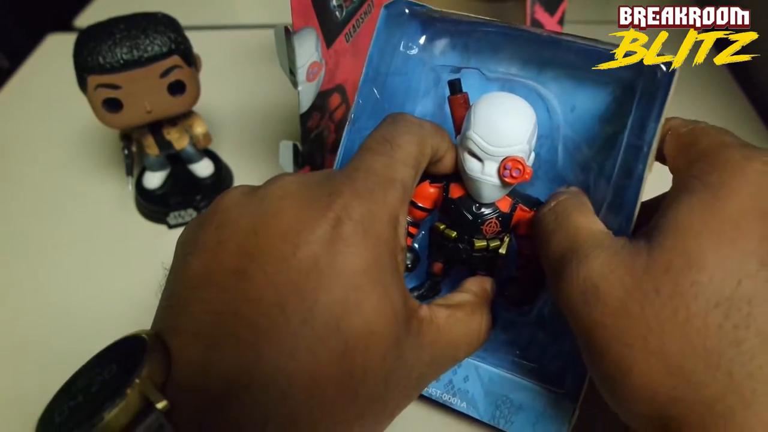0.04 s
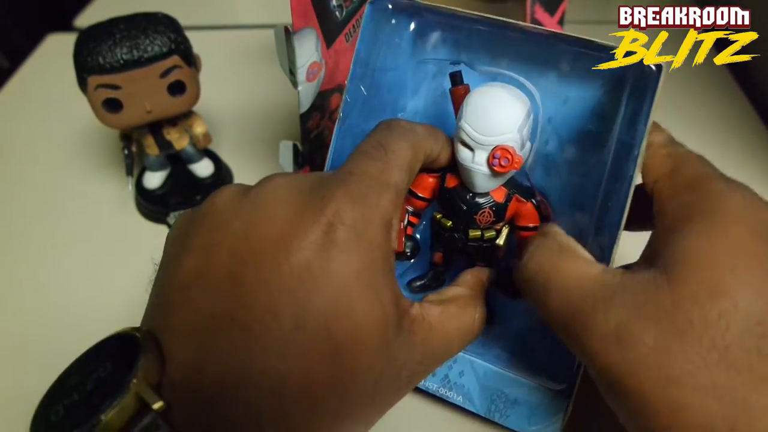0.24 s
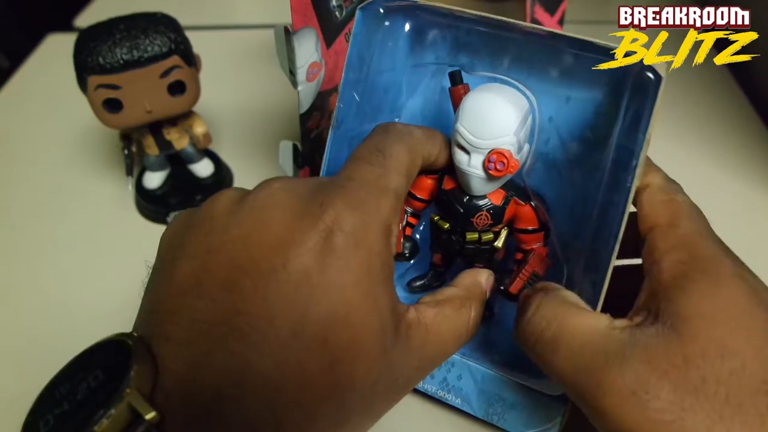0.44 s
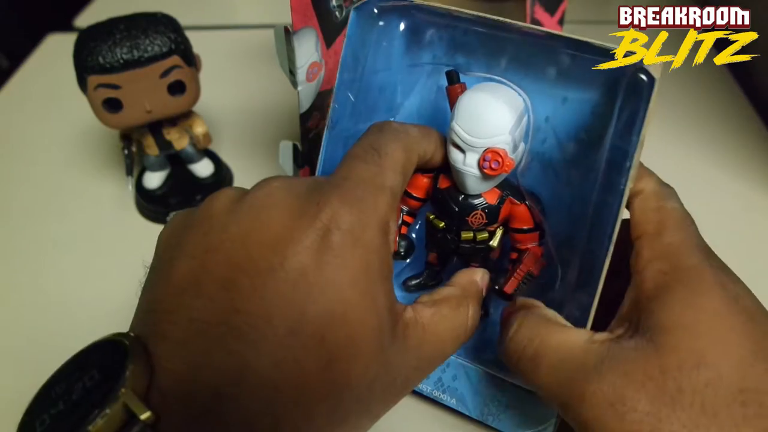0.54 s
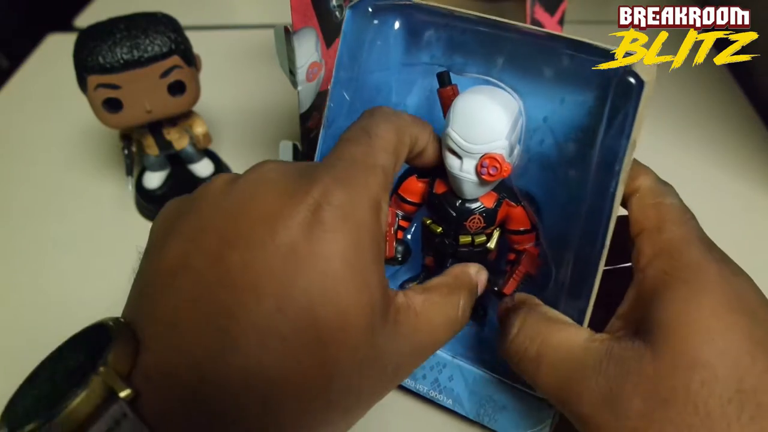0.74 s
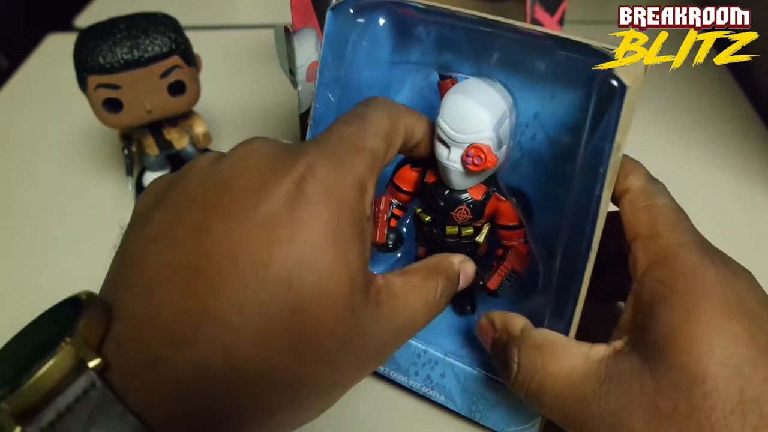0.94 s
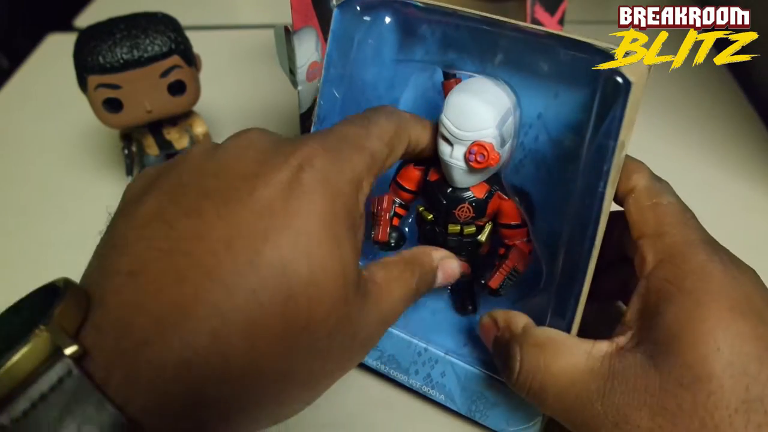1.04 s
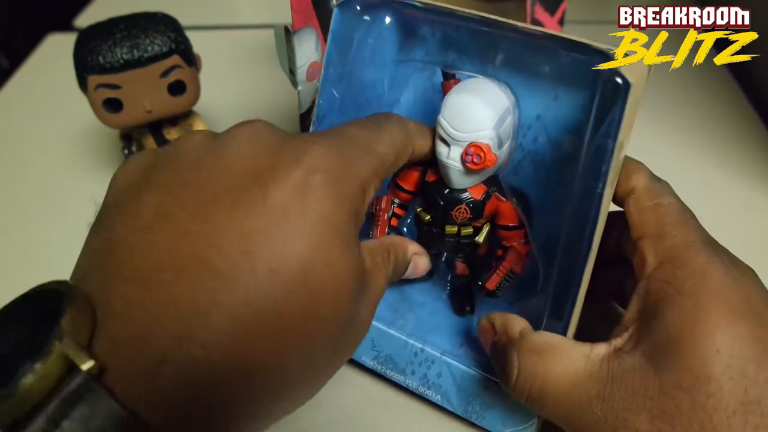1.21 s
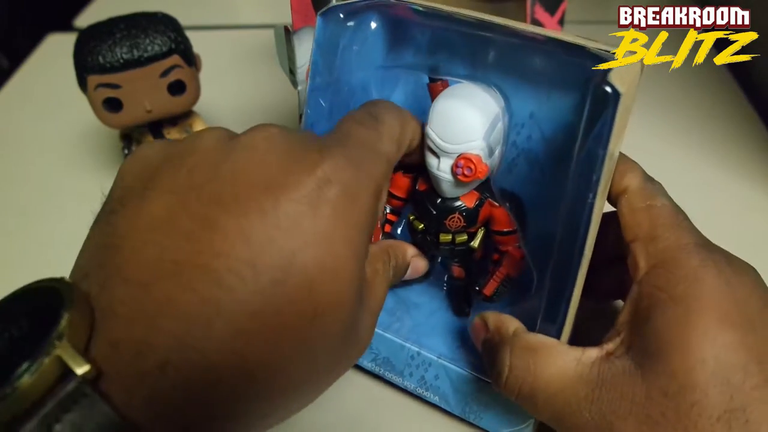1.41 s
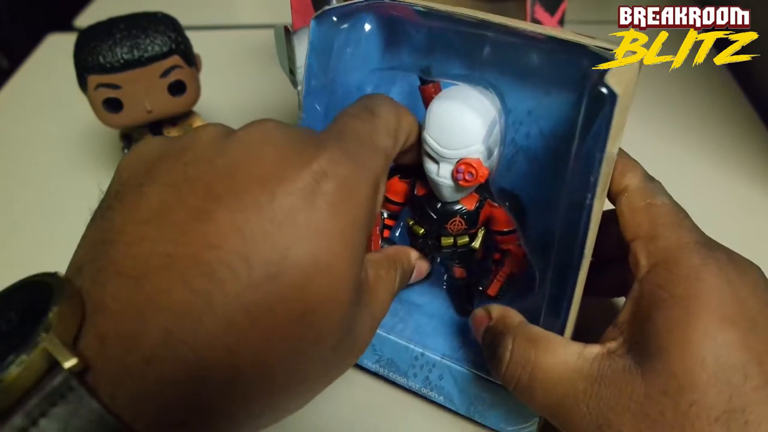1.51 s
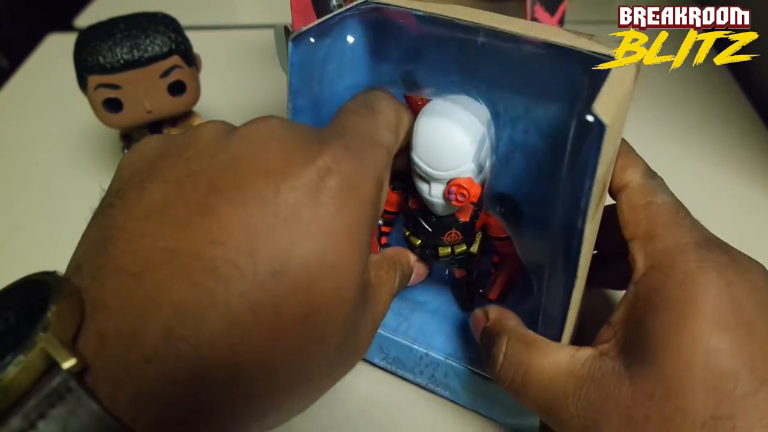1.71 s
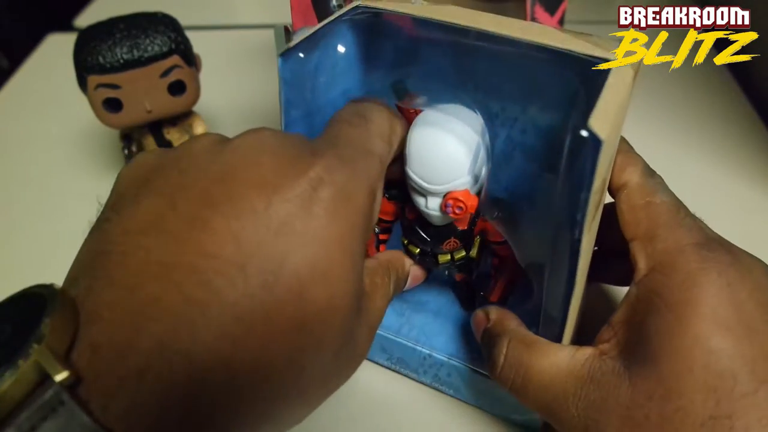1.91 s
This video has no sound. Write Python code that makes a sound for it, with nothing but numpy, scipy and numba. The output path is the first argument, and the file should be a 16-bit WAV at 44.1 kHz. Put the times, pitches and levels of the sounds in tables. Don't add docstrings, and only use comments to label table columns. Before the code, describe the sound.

Fingers press a toy out of a thin plastic tray on a table; hard clicks and raspy crinkles come in two early bursts, then sparser snaps and ticks, with dull low bumps and a short room tail.

```python
import sys
import numpy as np
from scipy import signal
from scipy.fft import rfft, irfft
from scipy.io import wavfile
from numba import njit

SR = 44100
rng = np.random.default_rng(int(sys.argv[2]) if len(sys.argv) > 2 else 0)


def invert_db(level):
    return 10 ** (np.asarray(level, dtype=float) / 20)


def pcm_store(signal):
    levels = np.round(np.clip(np.atleast_2d(signal), -1, 1) * 32767)
    wavfile.write(sys.argv[1], SR, levels.astype(np.int16).T)


N = 85995

# start in seconds [s], level [dB], main ring [Hz],
# middle rings [dB], treble crack [dB].
SNAPS = [(0.087, -18.5, 1160, -12.5, -12), (.211, -12.5, 1800, -17.5, -19), (0.2462, -9, 1440, -29, -39),
         (0.2637, -9.5, 1950, -20, -26), (0.2843, -20, 1160, -9, -3.5), (0.2908, -12, 1410, -7.5, -14.5),
         (.315, -2.5, 1660, -10, -21), (.564, -18, 734, -14.5, -16.5), (0.6222, -21.5, 1720, -1, -10.5),
         (.683, -6, 1760, -22, -33), (.703, -10.5, 1160, -10, -13), (0.718, -17.5, 1610, -4, -20),
         (0.798, -21, 1490, 0.5, 0), (0.804, -10, 850, -1.5, -13), (0.8431, -13, 1710, -8, -4.5),
         (0.8656, -15.5, 1290, -3.5, -1.5), (0.9671, -11, 770, -20, -25), (0.9702, -14.5, 850, 0.5, -2.5),
         (1.074, -9.5, 1370, -20, -21.5), (1.2315, -11, 1400, -18.5, -23.5), (1.2961, -9, 523, -12.5, -9.5),
         (1.383, -22.5, 710, 7.5, 8), (1.673, -17.5, 810, 3, 0), (1.7871, -17, 1330, -7.5, -7.5)]
# start in seconds [s], level [dB], main ring
# [Hz], upper rings [dB].
TICKS = [(0.001, -29.5, 1930, -17), (0.06, -43.5, 2100, -6.5), (0.144, -46.5, 1740, 3),
         (0.154, -35, 2000, -7.5), (0.187, -27.5, 1350, -20), (0.221, -33, 1270, -6),
         (0.236, -18.5, 1400, -8), (0.257, -34, 1840, 2), (0.391, -21, 1410, -17),
         (0.427, -23, 2040, -34), (0.446, -27.5, 794, -8), (0.479, -20.5, 1980, -31),
         (0.487, -25.5, 820, -11), (0.531, -22.5, 1870, -32), (0.545, -31.5, 1800, -11.5),
         (0.571, -20.5, 800, -23.5), (0.6, -25.5, 740, -13), (0.617, -20, 1700, -20),
         (0.627, -20.5, 1670, -11.5), (0.649, -33, 1800, -6),
         (0.909, -31.5, 557, -7), (0.93, -31.5, 627, -0.5), (1.012, -16.5, 1420, -14),
                (1.029, -28, 815, -26), (1.044, -17, 1970, -13), (1.059, -23, 1330, -16),
                (1.094, -32, 1740, -5), (1.161, -35, 665, -25), (1.177, -29, 1980, -18),
                (1.184, -28.5, 1770, -17), (1.209, -23.5, 700, -14.5), (1.247, -16.5, 690, -15),
                (1.46, -56, 725, 8), (1.531, -45, 1780, -4.5), (1.545, -24, 1860, -15),
                (1.559, -38, 654, -4), (1.582, -40.5, 856, -1.5), (1.663, -18, 1210, -28),
                (1.695, -21, 780, -19.5), (1.714, -31, 1180, -10.5),
         (1.729, -40, 587, -17), (1.749, -18.5, 1550, -11.5), (1.773, -26.5, 1050, -36.5),
                   (1.808, -23.5, 1300, -22), (1.833, -22, 1110, -7.5), (1.839, -18, 1650, -15.5),
                   (1.845, -23, 790, -8), (1.855, -23, 1030, -20), (1.878, -23.5, 750, -23),
                   (1.916, -49, 713, 5), (1.945, -23.5, 2360, -13.5),
         (.192, -26.5, 1310, -14.5), (.217, -17.5, 1990, -26), (.007, -45, 2400, -3.5),
               (.268, -15.5, 1950, -18), (.2735, -22.5, 2300, -21), (.349, -20.5, 800, -32),
               (0.7268, -18, 1700, -8), (0.736, -15, 1930, -20), (.74, -9, 1770, -25),
               (0.75, -8, 1900, -19), (0.76, -10, 1400, -20), (0.766, -23, 2080, -8),
               (.773, -15, 1890, -18), (.778, -12, 1800, -14), (1.2266, -26, 900, -12.5),
               (0.791, -26, 1410, -8), (.815, -16, 1500, -11.5), (1.393, -29, 1140, -14),
               (1.524, -30.5, 1740, -16.5), (.984, -25, 1400, -6), (1.617, -36, 1300, -12.5)]
# start in seconds [s], pitch [Hz], level [dB], decay t60 [s].
FOLDS = [(0.3157, 488, -8.5, 0.013), (.3158, 850, -1.5, 0.01), (0.316, 1277, 0, 0.012),
         (0.3156, 2430, -8.5, 0.0045), (0.3169, 3000, -11.5, 0.0097), (.8444, 590, -13.5, 0.0076),
         (0.8439, 1440, -11, 0.012), (.8444, 1680, -7, 0.0091), (.8444, 2450, -14.5, 0.0092),
         (0.8439, 4360, -6.5, 0.0025), (0.8668, 3470, -14, 0.0075), (0.8673, 4580, -7, 0.0063),
         (0.867, 5530, -13, 0.011), (.871, 1245, -19, 0.013), (0.9708, 544, -10, .010),
         (.9713, 840, -12, 0.011), (0.9712, 1370, -14.5, 0.014), (0.9714, 3640, -0.5, 0.0032),
         (1.2973, 725, 2, 0.0068), (1.2973, 1205, 0, 0.0059), (1.298, 1660, -7.5, 0.008),
         (1.2974, 3000, -6, 0.0059), (1.297, 4000, -11, 0.0072), (1.384, 1255, -24, 0.017),
         (1.384, 2170, -16.5, 0.0049), (1.384, 3460, -11.5, 0.0078), (1.384, 5000, -14.5, 0.0074),
         (1.384, 7140, -7.5, .004), (1.6745, 584, -15, 0.017), (1.676, 1230, -17.5, 0.016),
         (1.6766, 1735, -19.5, 0.012), (1.6745, 2480, -18, 0.013), (1.6741, 3620, -6.5, 0.0036)]
# pitch [Hz], level [dB].
SHELL_MODES = [(465, -22), (690, -16), (830, -20), (1250, -16.5), (1750, -13.5), (2280, -20.5)]
# time in seconds [s], level [dB], brightness [dB].
PRESSURE = [(0, -60.5, -11), (0.182, -58, -22.5), (0.205, -42, -6.5), (0.297, -28.5, -18.5),
            (0.327, -57, -19.5), (0.688, -49.5, -25), (0.727, -28, -14), (0.843, -27.5, -13),
            (0.887, -44.5, -39), (.962, -44, -17), (0.976, -35, -14), (1.11, -50.5, -20.5),
            (1.45, -60.5, -20), (1.52, -52, -16.5), (1.618, -49.5, -17), (1.649, -67.5, -18),
            (1.676, -46.5, -14.5), (1.95, -48.5, -22)]
# pitch [Hz], level [dB].
CREAK_MODES = [(620, -4.5), (1250, -9), (2260, -38)]
# start in seconds [s], level [dB].
JOLTS = [
    (.316, -13.5),
    (.844, -19),
    (0.972, -17),
    (1.2975, -13.5),
]
# frequency [Hz], level [dB per Hz].
AIR_SPECTRUM = [(18, -13), (60, -7), (140, -0.5), (288, -10), (680, -19), (1870, -31), (13000, -38)]

MAIN_CYCLES, SHELL_T60_S, MID_T60_S, TOP_T60_S = 5.5, .016, .005, .0022
MID_HZ, TOP_HZ = (2443, 5390), (5590, 14350)
SPREAD_S, BUILD_S = .00045, .0009
AFTER_S, AFTER_RING, AFTER_DB = .0022, 3, -12
TICK_TOP_DB = -4
CRACKLE_PER_S, CRACKLE_SCATTER_DB = 550, 2.8
RUB_PER_S, RUB_DB, PATCH_S, PATCH_DB = 14000, -4.5, .004, 3
CREAK_S, CREAK_PER_S, CREAK_T60_S, CREAK_DB = (.8975, .962), 143, .014, -26
THUMP_HZ, THUMP_DB, THUMP_T60_S = 199, -18, 0.0097
THUMP_GROWTH = 1.5
KNOCK_S, KNOCK_HZ, KNOCK_T60_S, KNOCK_DB = .8052, 465, .065, -17
ROOM_T60_S, ROOM_DAMP, ROOM_DB = 0.093, 0.22, -19
RUMBLE_HZ, RUMBLE_DB, RUMBLE_FOLLOW = 42, -71.5, 0.77
AIR_DB = -72.5
PORT_LAG_S, WIDE_HZ, LEFT_TOP_DB = .00002, 8400, -2
SHELL_LOW_HZ, MIC_TOP_HZ = 257, 15100


@njit
def rings(start, hz, t60, size, turn, n, sr):
    out = np.zeros((2, n))
    for g in range(len(hz)):
        step = np.exp(2j * np.pi * hz[g] / sr - np.log(1000.) / (t60[g] * sr))
        z, rise, ease = 1 + 0j, 1., np.exp(-3 * hz[g] / sr)
        left = size[g, 0] * np.exp(1j * turn[g, 0])
        right = size[g, 1] * np.exp(1j * turn[g, 1])
        for i in range(start[g], min(n, start[g] + int(t60[g] * sr))):
            rise *= ease
            out[0, i] += (z * left).imag * (1 - rise)
            out[1, i] += (z * right).imag * (1 - rise)
            z *= step
    return out


def grains(t, hz, t60, db, sign=None):
    t, hz, t60, db = (np.ravel(v) for v in np.broadcast_arrays(t, hz, t60, db))
    c = rng.standard_normal((len(hz), 3))
    wide = np.tanh(hz / WIDE_HZ)
    if sign is None:
        sign = np.where(c[:, 0] > 0, 0, np.pi)
    apart = wide * c[:, 1] * 0.69 - np.pi * np.minimum(hz, WIDE_HZ / 2) * PORT_LAG_S
    pan_db = wide * (LEFT_TOP_DB + 2 * c[:, 2]) / 2
    size = np.stack([invert_db(db + pan_db), invert_db(db - pan_db)], axis=1)
    turn = np.stack([sign + apart, sign - apart], axis=1)
    start = np.clip(t * SR, 0, N).astype(np.int64)
    return rings(start, np.minimum(hz, .45 * SR), np.abs(t60), size, turn, N, 1. * SR)


def buckle(t, db, hz, mid_db, top_db, count):
    t, db, hz, mid_db, top_db = (np.asarray(v)[:, None] for v in (t + BUILD_S, db, hz, mid_db, top_db))
    mode_hz, mode_db = np.array(SHELL_MODES).T
    c = rng.standard_normal((len(t), 3, len(mode_hz)))
    u = rng.random((len(t), 6, count))
    after = np.arange(count) % 2
    lag = np.where(after, AFTER_S, SPREAD_S)
    ring = np.where(after, AFTER_RING, 1)
    share_db = AFTER_DB * after - 10 * np.log10(count)

    def late(v):
        return t - lag * np.log(1 - .98 * v)

    def even(v):
        return (np.arange(count) + v) / count

    main = grains(t, hz, MAIN_CYCLES / hz, db - 4.5)
    shell_t = t + 2 * SPREAD_S * np.abs(c[:, 0])
    shell_hz = mode_hz * (1 + 0.047 * c[:, 1])
    shell = grains(shell_t, shell_hz, SHELL_T60_S, db - 2.5 + mode_db + 3 * c[:, 2])
    mid_hz = MID_HZ[0] * (MID_HZ[1] / MID_HZ[0]) ** even(u[:, 1])
    mid_t60 = ring * MID_T60_S * (.5 + u[:, 2])
    middle = grains(late(u[:, 0]), mid_hz, mid_t60, db + mid_db + share_db + 7.5)
    top_hz = TOP_HZ[0] + (TOP_HZ[1] - TOP_HZ[0]) * even(u[:, 4])
    top_t60 = ring * TOP_T60_S * (.5 + u[:, 5])
    treble = grains(late(u[:, 3]), top_hz, top_t60, db + top_db + share_db + 15.0)
    return main + shell + middle + treble


def snaps():
    return buckle(*np.array(SNAPS).T, count=20)


def folds():
    t, hz, db, t60 = np.array(FOLDS).T
    return grains(t, hz, t60, db, sign=np.pi * (np.arange(len(t)) % 2))


def ticks():
    rows = np.array(TICKS)
    t, db, hz, upper_db = rows.T
    return buckle(t, db, hz, upper_db, upper_db + TICK_TOP_DB, count=14)


def pressure(t):
    at, db, bright_db = np.array(PRESSURE).T
    return np.interp(t, at, db), np.interp(t, at, bright_db)


def crackle():
    u = rng.random((int(CRACKLE_PER_S * N / SR), 3)).T
    t = u[0] * N / SR
    press_db, bright_db = pressure(t)
    db = press_db + 6 - CRACKLE_SCATTER_DB * np.log(1 - .99 * u[1])
    return buckle(t, db, 500 * 5.14 ** u[2], bright_db, bright_db - 5, count=6)


def rub():
    u = rng.random((int(RUB_PER_S * N / SR), 3)).T
    t = u[0] * N / SR
    hz = 1200 + 13500 * u[1] ** 1.746
    press_db, bright_db = pressure(t)
    db = press_db + bright_db + RUB_DB - 2.3 * np.log(1 - .99 * u[2])
    patch = rng.standard_normal((int(N / SR / PATCH_S) + 1, 4))
    catch_db = PATCH_DB * patch[(t / PATCH_S).astype(int), (4 * u[1]).astype(int)]
    return grains(t, hz, 16 / hz, db + catch_db)


def creak():
    t = np.arange(CREAK_S[0], CREAK_S[1], 1 / CREAK_PER_S)[:, None]
    mode_hz, mode_db = np.array(CREAK_MODES).T
    c = rng.standard_normal((len(t), 3, len(mode_hz)))
    slip_t = t + 0.00039 * c[:, 0, :1]
    hz = mode_hz * (1 + 0.033 * c[:, 1])
    return grains(slip_t, hz, CREAK_T60_S, CREAK_DB + mode_db + 0.96 * c[:, 2])


def thumps():
    snap_t, snap_db = np.array(SNAPS).T[:2]
    jolt_t, jolt_db = np.array(JOLTS).T
    small = grains(snap_t + BUILD_S, THUMP_HZ, THUMP_T60_S, THUMP_GROWTH * snap_db + THUMP_DB)
    hard = grains(jolt_t, THUMP_HZ, THUMP_T60_S, jolt_db)
    return small + hard + grains(KNOCK_S, KNOCK_HZ, KNOCK_T60_S, KNOCK_DB)


@njit
def walls(x, lags, gain, damp):
    line, soft, out = np.zeros((8, 4096)), np.zeros(8), np.zeros((2, len(x)))
    for i in range(len(x)):
        total = 0.
        for k in range(8):
            soft[k] += (1 - damp) * (gain[k] * line[k, (i - lags[k]) & 4095] - soft[k])
            total += soft[k]
            out[k % 2, i] += soft[k]
        for k in range(8):
            line[k, i & 4095] = x[i] + soft[k] - total / 4
    return out


def room_tail(shell):
    lags = rng.integers(150, 1500, 8)
    gain = invert_db(-60 * lags / SR / ROOM_T60_S)
    return invert_db(ROOM_DB) * walls(shell.mean(axis=0), lags, gain, ROOM_DAMP)


def tinted_noise(gain):
    return irfft(rfft(rng.standard_normal((2, N))) * gain, N)


def rumble(f):
    low = tinted_noise(1 / (1 + (f / RUMBLE_HZ) ** 2))
    low = low[0] + .5 * low[1] * np.array([[1], [-1]])
    swell_db = RUMBLE_FOLLOW * (pressure(np.arange(N) / SR)[0] + 55)
    return invert_db(RUMBLE_DB + swell_db) * low / low.std()


def room_air(f):
    hz, db = np.array(AIR_SPECTRUM).T
    air = tinted_noise(invert_db(np.interp(np.log(f), np.log(hz), db)))
    return invert_db(AIR_DB) * air / air.std()


def scene():
    shell = snaps() + folds() + ticks() + crackle() + rub() + creak()
    thin = signal.butter(3, SHELL_LOW_HZ, "high", fs=SR, output="sos")
    shell = signal.sosfilt(thin, shell)
    f = np.maximum(np.arange(N // 2 + 1) * SR / N, 20)
    return shell + thumps() + room_tail(shell) + rumble(f) + room_air(f)


def band_limit(x):
    return signal.sosfilt(signal.butter(12, 16490, fs=SR, output="sos"), x)


def record(dry):
    roll_off = signal.butter(12, MIC_TOP_HZ, fs=SR, output="sos")
    mix = np.clip(signal.sosfilt(roll_off, dry), -1, 1)
    return band_limit(mix)


dry = scene()
out = record(dry)
pcm_store(out)
```